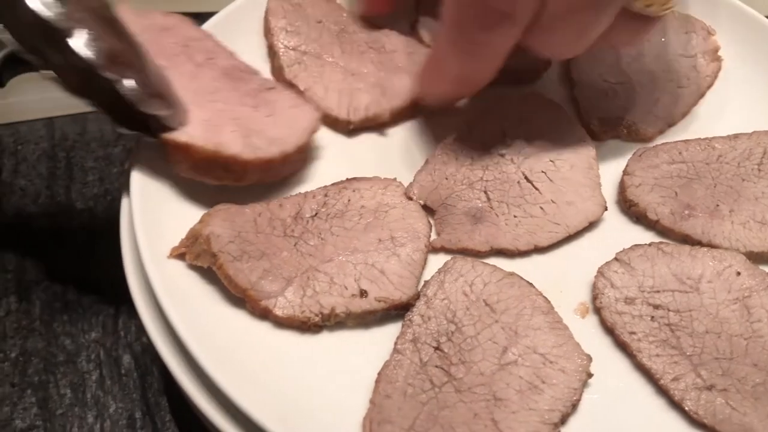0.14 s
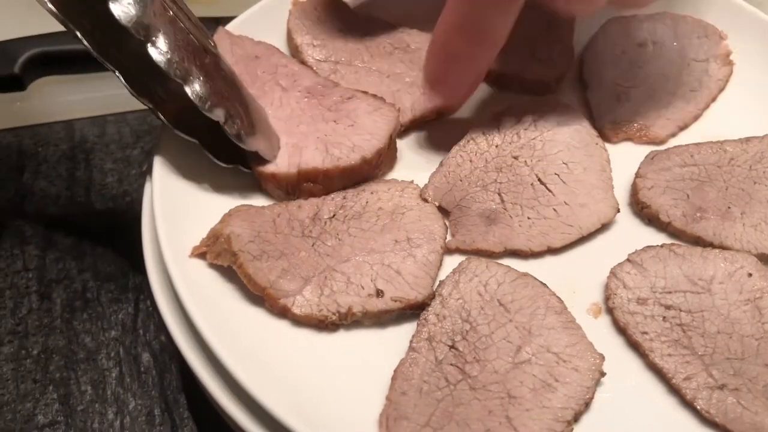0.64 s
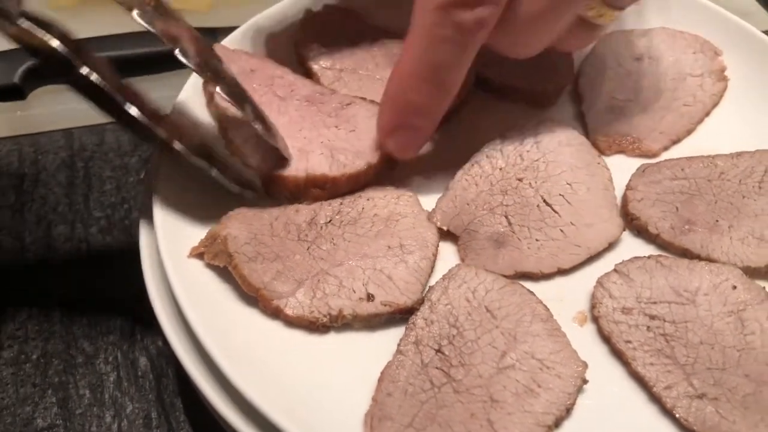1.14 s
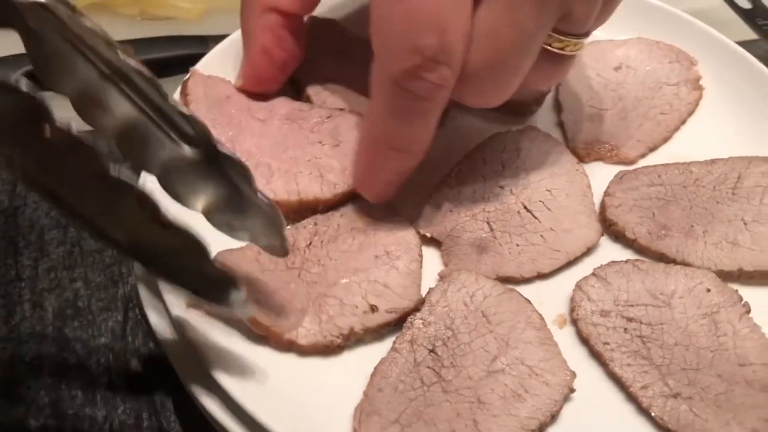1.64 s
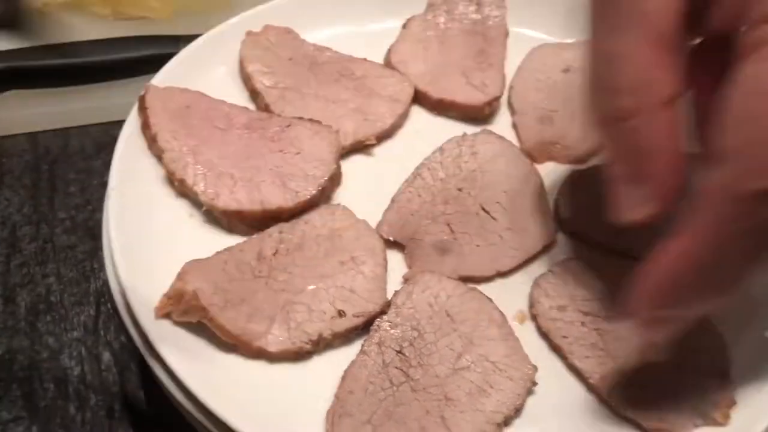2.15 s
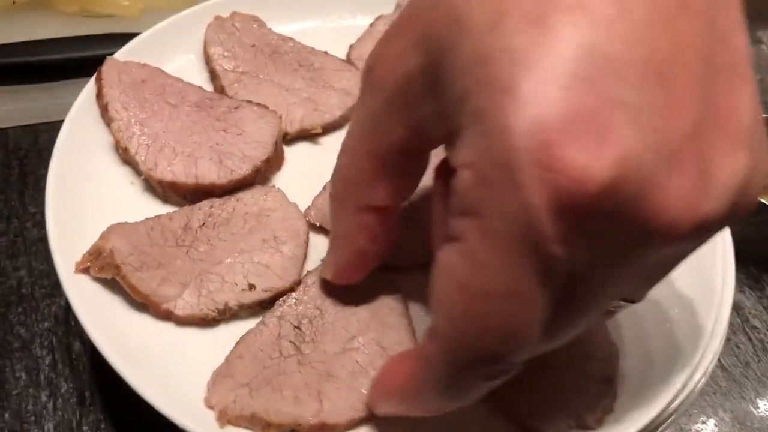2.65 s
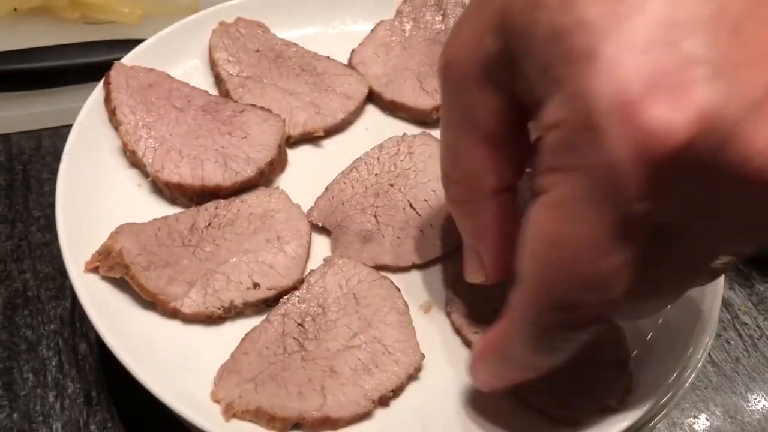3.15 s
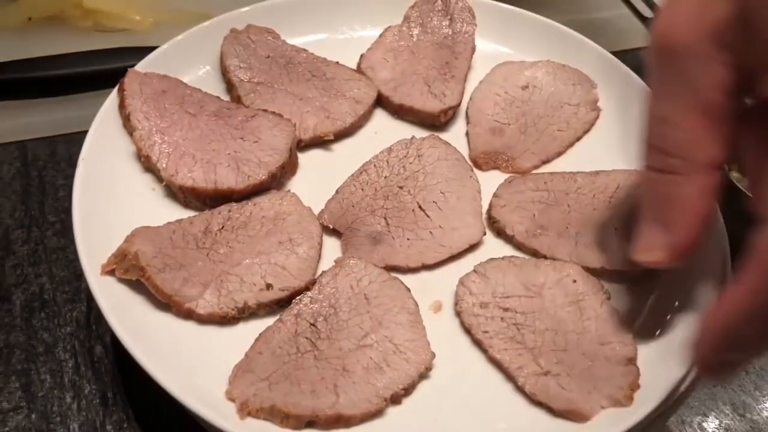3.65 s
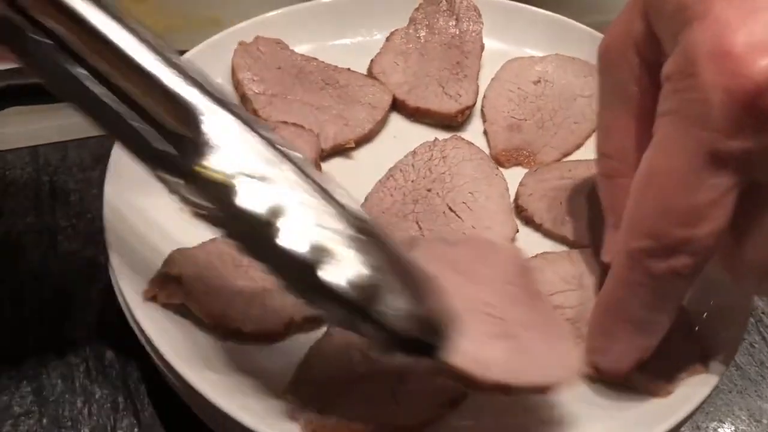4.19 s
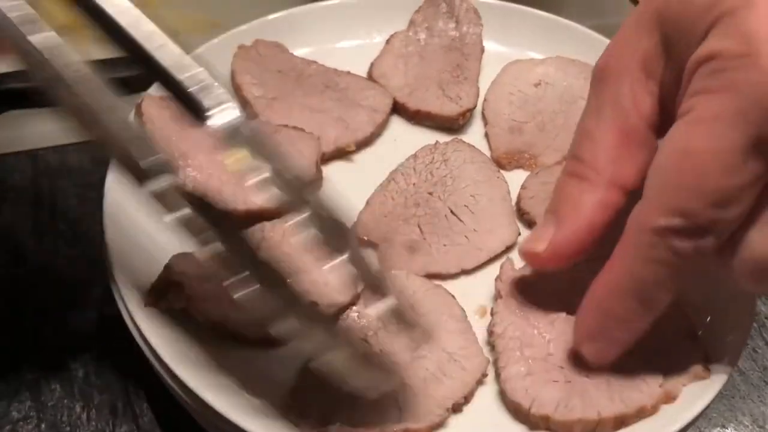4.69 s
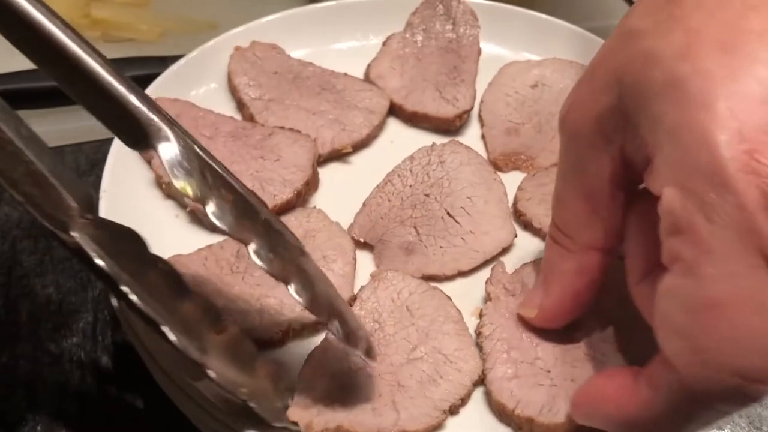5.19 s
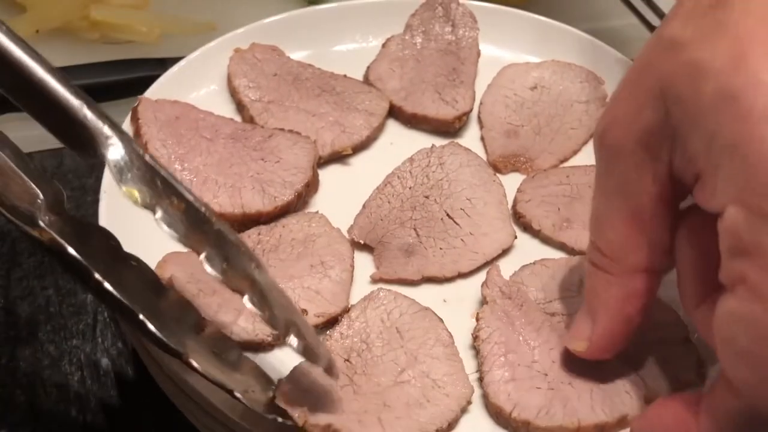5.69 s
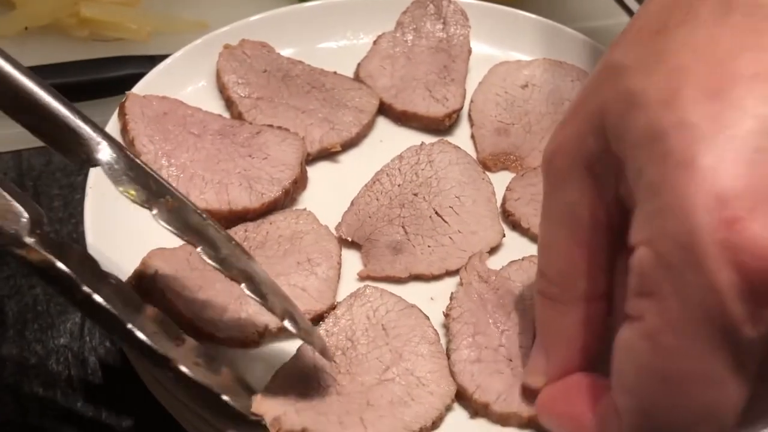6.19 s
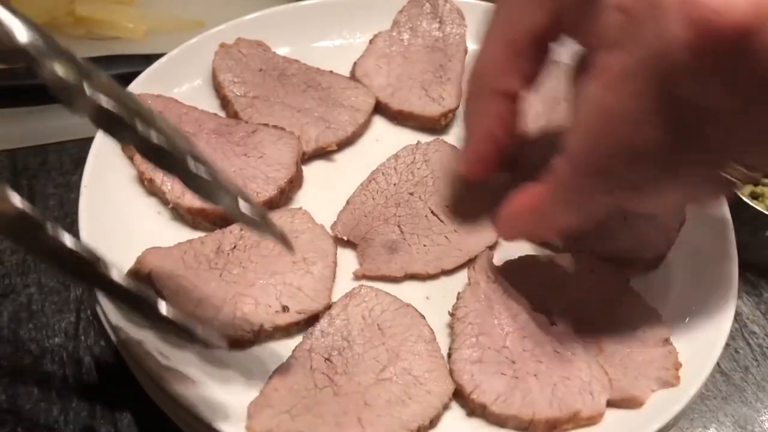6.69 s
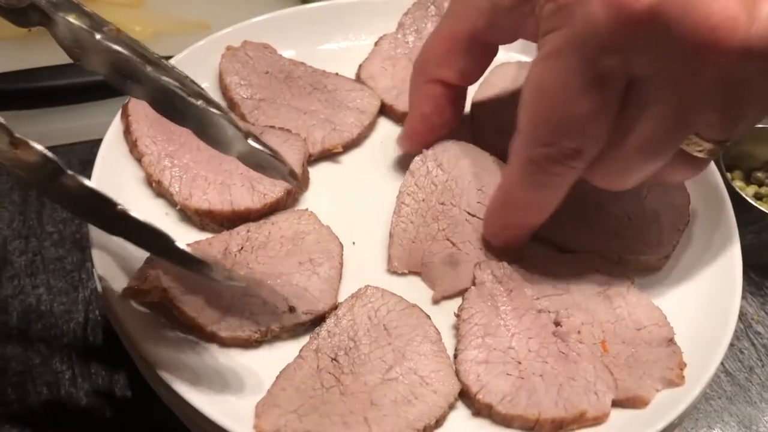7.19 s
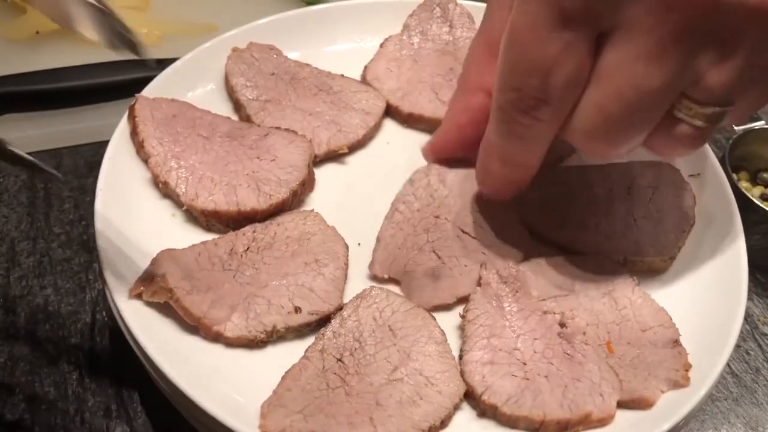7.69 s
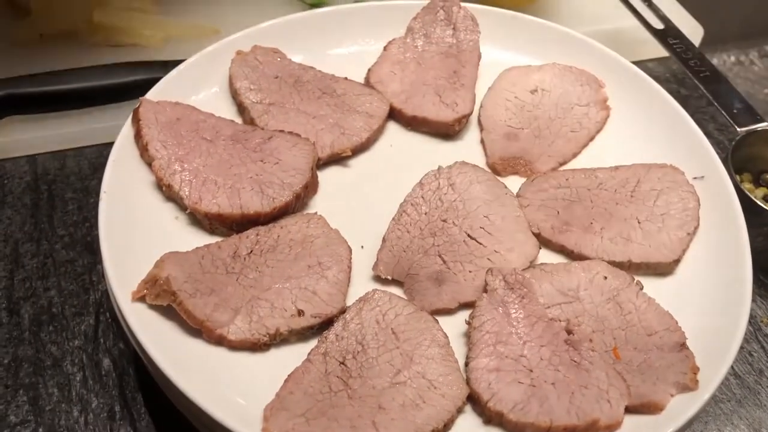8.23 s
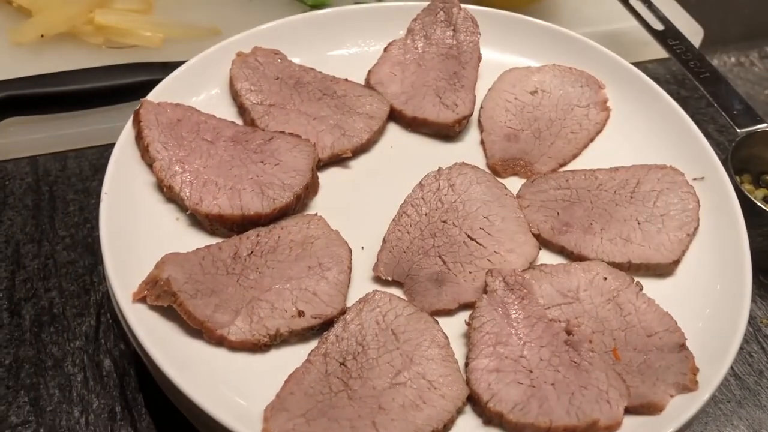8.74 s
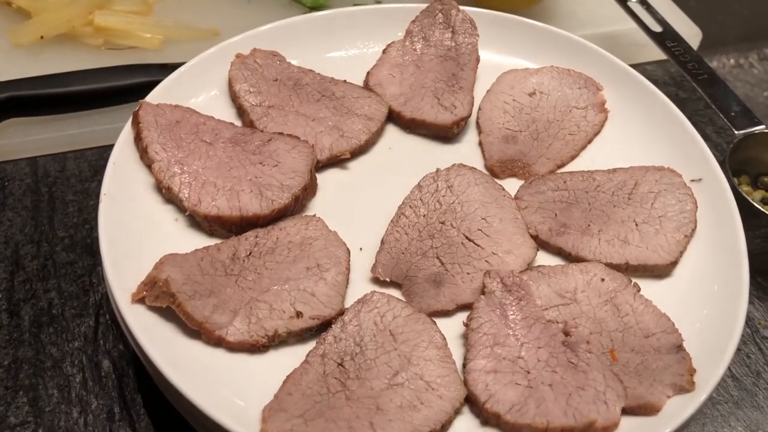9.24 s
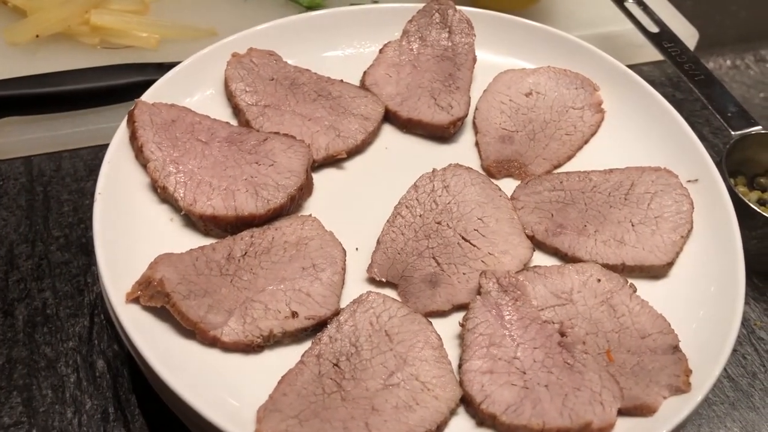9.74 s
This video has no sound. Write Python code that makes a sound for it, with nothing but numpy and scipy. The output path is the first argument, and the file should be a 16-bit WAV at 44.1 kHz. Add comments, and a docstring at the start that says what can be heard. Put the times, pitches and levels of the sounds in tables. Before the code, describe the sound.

Close ceramic clinks, soft knocks and faint moist ticks while meat is laid on a plate, ending with steel tongs put down and scraped.

```python
"""Arranging cold meat on stacked plates

A plate stacked on another rocks, knocks and slides, close to the microphone, as tongs and fingers lay slices.
Plate and tongs, often together, are sets of ringing modes, struck by chattering contacts or rubbed by grit.
Moist meat ticks as it peels off the glaze, each tick a brief decaying sine near 10.6 kHz.
Later the tongs are put down and dragged along the counter, and a low rumble swells.
A quiet kitchen hums behind in shaped noise and a mains tone; its hard walls add a short diffuse tail."""
import sys
import numpy as np
from scipy import signal
from scipy.fft import rfft, irfft
from scipy.io import wavfile
from scipy.ndimage import uniform_filter1d

SR = 44100
rng = np.random.default_rng(int(sys.argv[2]) if len(sys.argv) > 2 else 0)


def undo_db(level):
    """Turn decibels back into plain size, where 20 dB means ten times bigger."""
    steps = np.asarray(level, float) / 20
    return 10 ** steps


def unload_audio(sound):
    """Save the sound as a 16-bit wav file, at the path given as the first command line argument."""
    columns = np.transpose(np.atleast_2d(sound))
    # keep every value between -1 and 1, then stretch to whole-number steps
    steps = np.round(np.clip(columns, -1, 1) * 32767)
    wavfile.write(sys.argv[1], SR, steps.astype(np.int16))


N = 434820
RING = int(.45 * SR)  # length of a ring-down [samples]

# Knocks of the stacked plate, some of them struck by the tongs: (time [s],
# nominal clink peak at 1.5-5 kHz [dB], knock under 1.5 kHz [dB re clink],
# edge over 5 kHz [dB re clink], favoured mode [Hz])
PLATE_KNOCKS = [(0.0074, -16, -6, -25.5, 2760), (0.0638, -24, -0.5, -38, 2410),
                (0.7458, -17, -5.5, -15, 2800), (0.7533, -7, -10.5, -21, 2405),
                (0.7687, -17.5, -7, -10.5, 5490), (0.8846, -25.5, -11.5, -13.5, 3360),
                (1.1697, -40.5, -12, -7, 2000), (1.239, -43, -26, -1, 3700), (1.4241, -30, 0, -37, 3070),
                (1.4639, -44.5, 10, -10.5, 2150), (1.485, -47.5, 14, -18, 2100),
                (1.6835, -22.5, -1, -38, 2800), (1.7227, -38.5, 9.5, -15.5, 1580),
                (2.561, -16, -7.5, -14, 3210), (2.581, -15, -5, -15, 2970), (2.5928, -11, -14, -6, 3250),
                (2.603, -14.5, -6, -10, 3100), (2.7102, -27.5, 0, -40, 3050), (3.1041, -31, -1, -57, 2960),
                (3.1969, -40, 4.5, -51, 2400), (3.266, -34.5, 6.5, -30, 1790),
                (3.8891, -28.5, -6, -18.5, 3010), (3.897, -18.5, -5, -14.5, 2390),
                (3.92, -20, -5, -12.5, 2360), (3.936, -26, -7, -10, 3300), (4.9161, -26.5, -5, -13.5, 3540),
                (4.9273, -27.5, -4, -19, 3350), (5.0138, -24, -10.5, -21, 1680),
                (5.025, -24.5, -9, -23, 2800), (5.0707, -26.5, -3.5, -39, 2400),
                (5.186, -39, -2.5, -30, 3360), (5.222, -27.5, -9, -12, 3580),
                (5.245, -35, -3.5, -12.5, 3470), (5.341, -30.5, -6, -15.5, 3800),
                (5.3579, -36, -3, -23, 3450), (5.5787, -40, -9, -17, 3400),
                (5.613, -22.5, -13, -23.5, 1570), (5.6367, -24.5, -6, -10.5, 3370),
                (5.706, -28, -9.5, -30, 1580), (5.7383, -20.5, -8, -7.5, 3470),
                (5.7507, -29, 3.5, -6.5, 3480), (5.7643, -14.5, -9.5, -26.5, 2890),
                (6.908, -51, -14, -30, 2800), (7.214, -27.5, -10, -22, 1596), (7.228, -31.5, 0, -24, 3380)]
# Ringing modes of the steel tongs: (frequency [Hz], level [dB], t60 of the free part [s])
TONG_MODES = [(300, -6, .1), (615, 0, .12), (1000, 0, .07), (1430, -4, .1), (1900, -7, .1), (2320, -3, .05),
              (2750, -5, .07), (3110, 0, .17), (3700, -5, .1), (4345, -1, .15), (4890, -7, .15),
              (5030, -3, .15), (5300, -6, .12), (5590, 0, .1), (5900, -5, .07), (6400, -2, .12),
              (6830, -1, .13), (8230, -3, .09), (8720, -6, .1), (9780, -2, .1), (10850, -5, .1),
              (11320, -4, .1), (11800, -5, .08), (13030, -2, .11), (13550, -4, .1), (14850, -5, .1),
              (15400, -6, .08)]


def band(x, lo_hz, hi_hz):
    """Band-pass along the last axis."""
    return signal.sosfilt(signal.butter(2, [lo_hz, hi_hz], "band", fs=SR, output="sos"), x)


def walk(rate):
    """Random levels held 1 / rate s and slewed twice."""
    hold = int(SR / rate)
    steps = np.repeat(rng.standard_normal(N // hold + 1), hold)
    return 0.95 * uniform_filter1d(uniform_filter1d(steps, hold), hold)[:N]


def kitchen():
    """Appliance and air noise that drifts a little, with a mains hum."""
    # background spectrum: (frequency [Hz], relative density [dB per Hz])
    spectrum = [(24, -50), (40, -19), (124, -2), (209, -9), (269, -8), (479, -16.5), (570, -4), (733, -15),
                (790, -15), (852, -16.5), (1440, -22), (1630, -22.5), (2440, -25.5), (16000, -51)]
    air_rms_db, hum_hz, hum_db = -56.5, 120, -69
    hz, db = np.transpose(spectrum)
    f = np.fft.rfftfreq(N, 1 / SR)
    shape = undo_db(np.interp(np.log(f + 1), np.log(hz), db))
    air = irfft(rfft(rng.standard_normal(N)) * shape, N)
    air = air * undo_db(0.28 * walk(16.0))
    hum = np.sin(2 * np.pi * hum_hz * np.arange(N) / SR) * undo_db(hum_db + 2.0 * walk(3.0))
    return air * undo_db(air_rms_db) / air.std() + hum


def colour(thud_db, knock_db, edge_db, top_db):
    """Levels of the five bands re clink; a softer contact loses the top faster still."""
    return [knock_db + thud_db, knock_db, 0 * edge_db, edge_db, 1.3 * edge_db + top_db]


def body(modes, grip_t60, free_db, dense_db, dense_t60, treble_loss):
    """Ring-downs with the band and pitch of each; many small modes merge into a short noise in each band."""
    # edges of the thud, knock, clink, edge and top bands: (frequency [Hz])
    edges_hz = [120, 700, 1500, 5000, 9000, 15500]
    t = np.arange(RING) / SR
    hz, db, t60 = np.transpose(modes)[:, :, None]
    # most of the motion is soaked up at once by food and hands, a small free part rings on
    fade = 1000 ** (-t / grip_t60) + undo_db(free_db) * 1000 ** (-t / t60)
    clear = undo_db(db) * np.sin(2 * np.pi * hz * t) * fade
    noise = rng.standard_normal(RING)
    dense = []
    for lo, hi in zip(edges_hz, edges_hz[1:]):
        decay = 1000 ** (-t / dense_t60 * (lo / 1500) ** treble_loss)  # dense_t60 holds at 1500 Hz
        even = np.sqrt(SR / 2 / (hi - lo))  # evens out the bandwidths
        dense.append(band(noise, lo, hi) * decay * undo_db(dense_db) * even)
    group = np.r_[np.digitize(hz[:, 0], edges_hz) - 1, np.arange(len(dense))]
    pitch = np.r_[hz[:, 0], np.ones(len(dense))]  # 1 marks a dense row
    return np.vstack([clear, dense]), group, pitch


def plate_and_tongs_body():
    """Clear modes of the plate together with the tongs that touch it, over a dense blur."""
    # ringing modes of plate and touching tongs: (frequency [Hz], level [dB], t60 of the free part [s])
    modes = [(250, -9, .2), (590, 0, .1), (690, -3, .08), (800, -5, .07), (1000, -1, .07), (1270, -3, .1),
             (1570, -3, .08), (1770, -4, .06), (2000, -4, .08), (2390, -2, .06), (2800, -2, .06),
             (3115, 0, .08), (3400, -3, .07), (4400, -4, .1), (4650, -7, .09), (5490, -11, .4),
             (6200, -3, .09), (6480, -2, .09), (6800, -1, .1), (7870, -2, .1), (8200, -5, .1),
             (8470, -5, .08), (9800, -3, .1), (10450, -3, .1), (11300, -3, .12), (11900, -5, .08),
             (12950, -2, .1), (14000, -7, .07), (14850, -4, .08)]
    return body(modes, 0.012, -9, 1.5, 0.05, treble_loss=0.056)


def open_tongs_body():
    """The open tongs' clear steel modes over a dense blur."""
    return body(TONG_MODES, 0.014, -12, 0, 0.069, treble_loss=0.24)


def shut_tongs_body():
    """Tongs held shut hardly ring: a weak free part under a strong dense blur."""
    return body(TONG_MODES, 0.025, -16.0, 9.8, 0.06, treble_loss=.5)


def strike(hits, rings, group, hz, thud_db, top_db, favour_db, chatter_ms):
    """Each blow chatters for a few ms; its spot favours one mode and scatters the others."""
    spot_db, first_touch, crest = 2.5, 3.6, 3.5  # first_touch: size of first contact against the chatter
    out, t, head = np.zeros(N + 2 * RING), np.arange(1500) / SR, int(.012 * SR)
    spots = rng.standard_normal((len(hits), len(rings)))
    grit = rng.standard_normal((len(hits), len(t)))
    for (s, db, knock_db, edge_db, main_hz), spot, g in zip(hits, spots, grit):
        favour = favour_db * np.exp(-(np.log(hz / main_hz) / 0.026) ** 2)
        gain = undo_db(spot_db * spot + favour)
        parts = np.array([gain[group == b] @ rings[group == b] for b in np.unique(group)])
        chatter = g * np.abs(g) * np.exp(-1000 * t / max(chatter_ms, .05))
        chatter[0] = first_touch
        parts = signal.fftconvolve(parts, chatter[None], axes=1)
        # in the clink band, neighbours of the favoured mode share the blow
        parts[2] += 0.72 * band(parts[2], main_hz / 1.49, main_hz * 1.25)
        # nominal peak is crest times the rms of the first 12 ms
        parts = parts / parts[:, :head].std(axis=1, keepdims=True) / crest
        sound = undo_db(db + np.array(colour(thud_db, knock_db, edge_db, top_db))) @ parts
        # a soft contact pushes longer and cannot reach the highest modes
        reach_hz = np.clip(24000 * undo_db(edge_db / 3.0), 2000, .45 * SR)
        sound = signal.sosfilt(signal.butter(3, reach_hz, fs=SR, output="sos"), sound)
        # a light, glancing contact cannot move the lowest ones
        floor_hz = np.clip(210 * undo_db(-.7 * knock_db), 200, 2800)
        sound = signal.sosfilt(signal.butter(2, floor_hz, "high", fs=SR, output="sos"), sound)
        out[int(s * SR):][:len(sound)] += sound
    return out[:N]


def plate_knocks(plate_and_tongs):
    """Knocks of the stacked plate, some of them struck by the tongs, so that plate and steel ring together."""
    return strike(PLATE_KNOCKS, *plate_and_tongs, thud_db=1.5, top_db=1.5, favour_db=6.5, chatter_ms=2.6)


def thumps():
    """Hard knocks press the stack onto the counter, which answers with a pair of short low notes."""
    t60_s, base_db, growth = .2, -22, 1.41  # base_db is added to growth times the clink dB
    t = np.arange(RING) / SR
    pair = np.sin(2 * np.pi * 232 * t) + np.sin(2 * np.pi * 267 * t)
    note = pair * 1000 ** (-t / t60_s) * np.minimum(t / .006, 1)
    push = np.zeros(N)
    for (s, db, *_), chance in zip(PLATE_KNOCKS, rng.standard_normal(len(PLATE_KNOCKS))):
        push[int(s * SR)] = undo_db(base_db + growth * db) * np.sign(chance)
    return signal.fftconvolve(push, note)[:N]


def room(x):
    """Diffuse tail off the hard walls, the treble dying first."""
    level_db, t60_s, top_t60_s = -17, 0.32, 0.26
    t = np.arange(SR // 2) / SR
    noise = rng.standard_normal(len(t))
    low = band(noise, 150, 2800)
    tail = low * 1000 ** (-t / t60_s) + (noise - low) * 1000 ** (-t / top_t60_s)
    tail = tail * np.minimum(t / 0.051, 1)  # builds up over 51 ms
    return undo_db(level_db) * signal.fftconvolve(x, tail / np.sqrt(np.sum(tail ** 2)))[:N]


def ticks():
    """A film of juice snaps: a sine that dies within a few cycles, each at its own pitch."""
    # moist meat letting go of glaze and fingers: (time [s], starting amplitude [dB])
    snaps = [(0.3211, -51), (0.3346, -49), (0.3758, -47), (0.4538, -50), (0.5229, -50), (0.5751, -54.5),
             (0.6626, -48.5), (1.548, -49), (1.6086, -52.5), (2.221, -42), (4.2976, -54), (5.3056, -40),
             (5.392, -38), (5.4906, -53), (5.5172, -50), (5.8801, -53), (6.1028, -46), (6.2312, -52),
             (6.399, -45), (6.4271, -39), (6.4734, -40), (6.981, -49.5)]
    centre_hz, spread = 10600, 0.064
    out, t = np.zeros(N + 200), np.arange(200) / SR
    for (s, db), chance in zip(snaps, rng.standard_normal(len(snaps))):
        hz = centre_hz * np.exp(spread * chance)
        out[int(s * SR):][:200] += undo_db(db) * np.sin(2 * np.pi * hz * t) * np.exp(-t * hz / 3.4)
    return out[:N]


def tong_clacks(shut_tongs):
    """Blows of the tongs held shut: dry clacks that all favour one pitch."""
    # (time [s], nominal clink peak [dB], knock [dB re clink], edge [dB re clink])
    clacks = [(0.4704, -50.5, -3, 1), (1.0953, -23.5, -4.5, -7.5), (2.821, -33.5, -18, 2.5),
              (5.9949, -18.5, -5.5, -1.5), (8.122, -23.5, -28.5, 0), (8.7948, -23, -7.5, 0.5),
              (8.896, -21, -11.5, 4.5), (9.082, -14.5, -1.5, -8), (9.0954, -26, -6, -32)]
    hits = [(*row, 3900) for row in clacks]  # favoured pitch [Hz]
    return strike(hits, *shut_tongs, thud_db=-21.5, top_db=0.0, favour_db=2, chatter_ms=1.6)


def slide(tables, rings, group, hz, thud_db, top_db, rough_db, damp_s, ease_s):
    """Gritty friction drives the same modes, damped by the contact."""
    t = np.arange(N) / SR
    grit = rng.standard_normal(N) * undo_db(rough_db * walk(120) + rough_db * walk(600))
    held = rings * np.exp(-np.arange(RING) / SR / damp_s)
    held[hz == 1] *= undo_db(-3)  # a steady rub feeds the clear modes more than the small ones
    bands = [signal.fftconvolve(grit, held[group == b].sum(axis=0))[:N] for b in np.unique(group)]
    out = np.zeros(N)
    for table in tables:
        s, db, knock_db, edge_db = np.transpose(table)
        touch = np.interp(t, [s[0] - ease_s, s[0], s[-1], s[-1] + .02], [0, 1, 1, 0])
        for x, rel_db in zip(bands, colour(thud_db, knock_db, edge_db, top_db)):
            out += touch * undo_db(np.interp(t, s, db + rel_db)) * x / x.std()
    return out


def plate_slides(plate_and_tongs):
    """Each slide of the plate speeds up, slows down and stops, heard as a swell and fade."""
    # (start [s], fastest [s], stop [s], clink-band rms when fastest [dB], knock [dB re clink])
    moves = [(0.84, 0.958, 1.07, -51.5, -14), (1.49, 1.533, 1.58, -51, -5), (1.663, 1.753, 1.8, -44, -4.5),
             (2.44, 2.509, 2.87, -41.5, -41), (2.602, 2.64, 2.715, -48, 3),
             (3.27, 3.296, 3.56, -67.5, 15.5), (5.618, 5.628, 5.66, -42, 2), (5.722, 5.723, 5.76, -50, -1),
             (3.947, 4.144, 4.24, -46, -30), (6.269, 6.299, 6.3, -53.5, -21), (7.78, 7.815, 8.34, -65, -31)]
    start_db, stop_db, edge_db = -13.5, -24.5, -9  # ends are relative to the fastest moment
    paths = []
    for start, fastest, stop, db, knock_db in moves:
        paths.append([(start, db + start_db, knock_db, edge_db),
                      (fastest, db, knock_db, edge_db),
                      (stop, db + stop_db, knock_db, edge_db)])
    return slide(paths, *plate_and_tongs, thud_db=-15.5, top_db=-6.0, rough_db=0, damp_s=0.014, ease_s=.03)


def tong_hits(open_tongs):
    """Blows of the open tongs, exciting their steel modes."""
    # (time [s], nominal clink peak [dB], knock [dB re clink], edge [dB re clink], favoured mode [Hz])
    hits = [(1.1174, -48, -19, 5, 5600), (1.1947, -32.5, -28, -1.5, 6760), (8.8063, -33.5, -12, -6.5, 3080),
            (8.9164, -30, -2.5, -9.5, 6150), (8.963, -13, -14.5, -10, 4345), (8.966, -16, -14, -12.5, 3110),
            (8.991, -33, -20, -14, 3110), (9.0495, -33, -18, -1.5, 4345), (9.059, -31, -14, -5.5, 4345),
            (9.4434, -45, -2, -3, 3760), (9.4794, -29.5, -31, -1.5, 4200), (9.5464, -24.5, -8, 2, 2750),
            (9.5543, -24.5, -28, 2.5, 5105), (9.7082, -28.5, -1.5, -11, 3000),
            (9.7378, -19, -2.5, -10, 1837), (9.7494, -26, -3, -21, 3700), (9.7707, -16, -5.5, -5.5, 5340),
            (9.7973, -20.5, -17, -1, 3700), (9.831, -16, 4, -13.5, 3900)]
    return strike(hits, *open_tongs, thud_db=-12, top_db=0.0, favour_db=6.5, chatter_ms=2.4)


def tong_slides(open_tongs):
    """The tongs brush the rim, skid to rest after being dropped, then are dragged, with uneven friction."""
    # one list per slide: (time [s], clink-band rms [dB], edge [dB re clink])
    drags = [
        [(1.168, -54, -10), (1.215, -62, 1), (1.266, -48, -4), (1.31, -56.5, -11)],
        [(9.1, -31.5, -0.5), (9.15, -45, -2), (9.3, -61.5, -28)],
        [(9.445, -49, -6), (9.53, -50, 10.5), (9.59, -42.5, 9.5), (9.645, -47, 2), (9.685, -42.5, 6),
         (9.765, -42.5, -1), (9.8, -32, 2.5), (9.86, -34.5, -5)],
    ]
    knock_db = -14.5
    paths = [[(s, db, knock_db, edge_db) for s, db, edge_db in drag] for drag in drags]
    return slide(paths, *open_tongs, thud_db=1.5, top_db=-9, rough_db=3.5, damp_s=0.012, ease_s=.006)


def rumble():
    """Dull noise near 75 Hz that swells towards the end."""
    # (time [s], rms level [dB])
    swell = [(8.8, -89), (9.201, -64), (9.6, -58), (9.86, -68)]
    x = band(band(rng.standard_normal(N), 66, 90), 54, 102)
    return x / x.std() * undo_db(np.interp(np.arange(N) / SR, *np.transpose(swell), left=-200))


def scene():
    """Plate, tongs and ticks in the room, over its hum and the rumble."""
    plate_and_tongs, open_tongs = plate_and_tongs_body(), open_tongs_body()
    near = plate_knocks(plate_and_tongs) + thumps() + ticks() + tong_clacks(shut_tongs_body())
    near = near + plate_slides(plate_and_tongs) + tong_hits(open_tongs) + tong_slides(open_tongs)
    # the near sounds carry no deep bass below about 185 Hz
    near = signal.sosfilt(signal.butter(4, 185, "high", fs=SR, output="sos"), near)
    return (near + room(near) + kitchen() + rumble())[None]


def low_pass(x):
    """Removes everything above the highest recorded frequency."""
    return signal.sosfilt(signal.butter(12, 16960, fs=SR, output="sos"), x)


def record(dry):
    """A steep low-pass cuts off the top above 16.2 kHz."""
    mix = signal.sosfilt(signal.ellip(8, .3, 60, 16200, fs=SR, output="sos"), dry)
    return low_pass(mix)


dry = scene()
out = record(dry)
unload_audio(out)
```